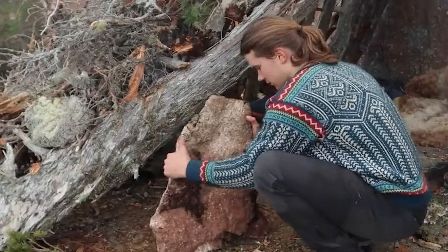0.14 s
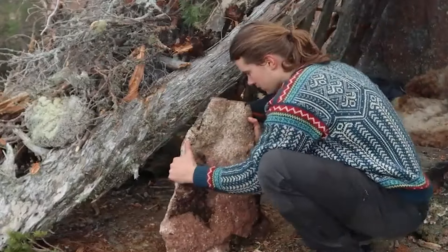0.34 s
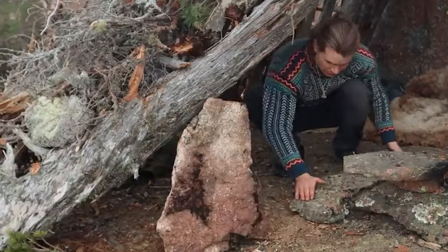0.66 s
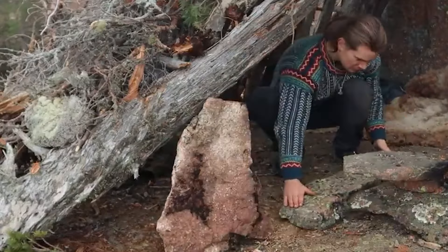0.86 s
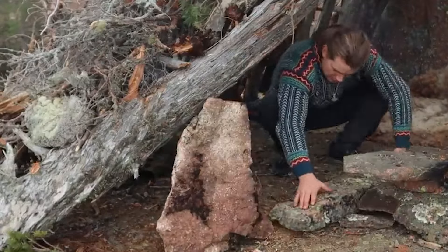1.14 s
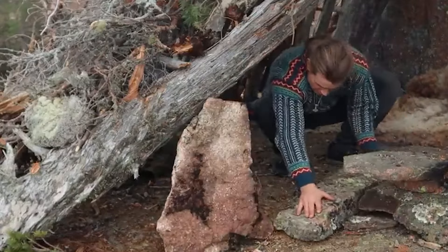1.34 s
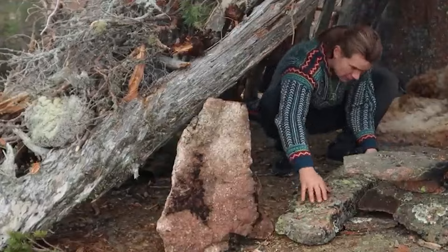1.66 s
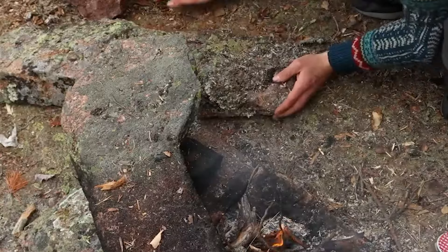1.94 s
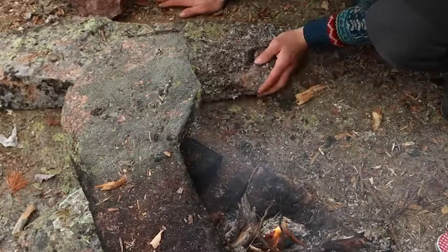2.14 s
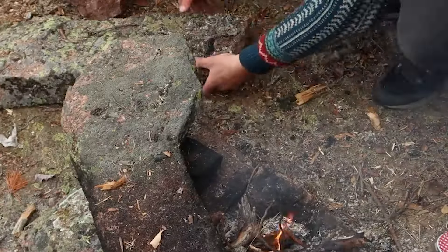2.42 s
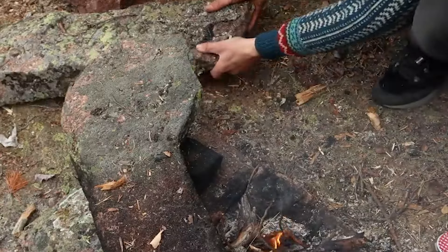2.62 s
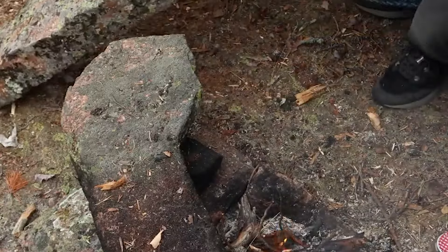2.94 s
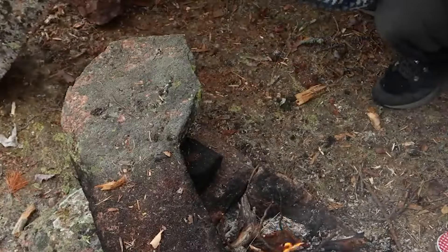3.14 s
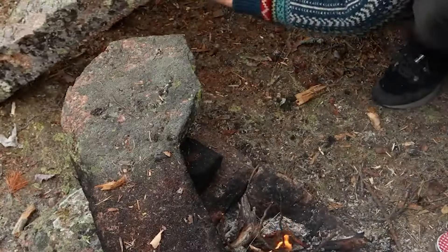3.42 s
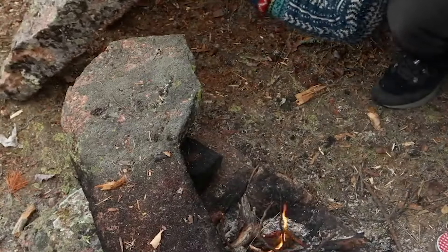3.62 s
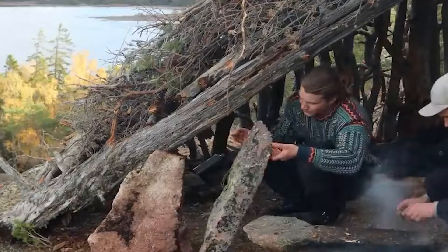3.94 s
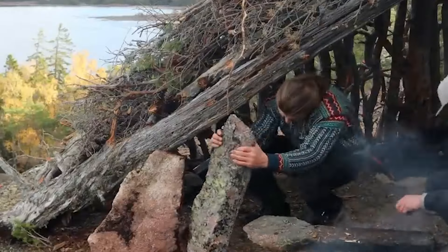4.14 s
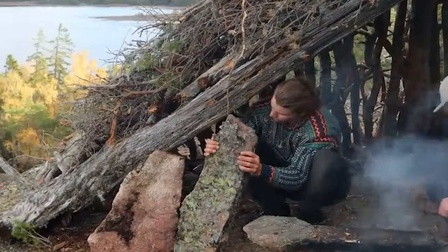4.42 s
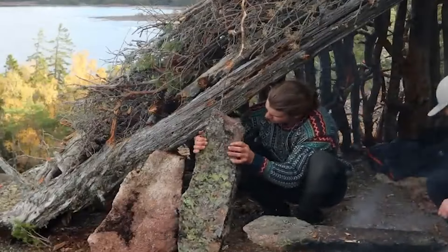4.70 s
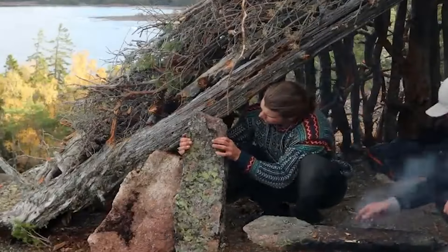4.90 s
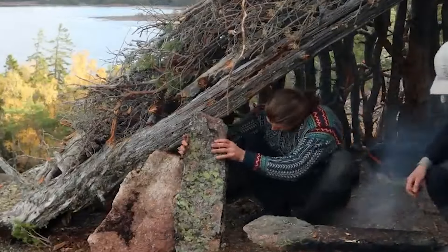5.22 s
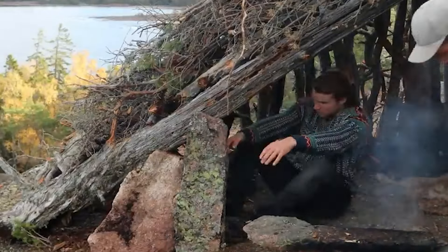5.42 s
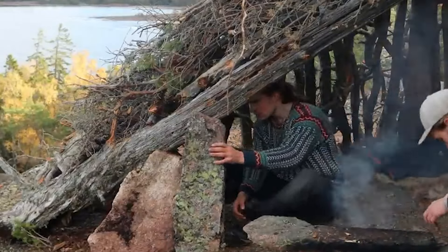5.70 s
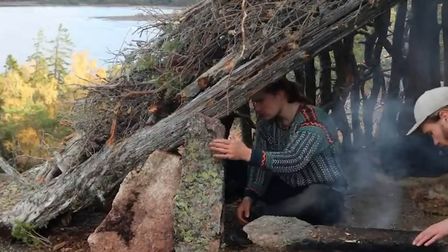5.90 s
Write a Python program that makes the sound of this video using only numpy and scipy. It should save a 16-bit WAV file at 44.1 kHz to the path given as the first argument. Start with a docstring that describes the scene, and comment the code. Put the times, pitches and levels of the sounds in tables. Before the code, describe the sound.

Stone knocks and grinds on stone in irregular bursts: a clatter with a sharp crack at first, then dull low thumps, then several squealing drags and bright hard blows. After a brief lull comes a crackle of twigs and one heavy scraping clunk, then only soft bumps, brushing cloth and small snaps. Dry, close outdoor pickup with constant airy hiss and faint fire ticks.

```python
"""Rock slabs are dragged over stone and stood on edge beside a campfire, outdoors.
Each shove is a train of tiny slips that rings the slab and makes it squeal; grit crunches under it.
Knocks, from faint ticks to hard blows, are short bursts of force that ring the slab, mostly near 2 kHz.
Snapping twigs, low bumps, a thin swish, rustling clothes and swells of low rumble are shaped noise
or fading tones over an outdoor hiss of changing level; a fast limiter holds the peaks."""
import sys
import numpy as np
from scipy import signal
from scipy.fft import rfft, irfft
from scipy.io import wavfile
from scipy.ndimage import uniform_filter1d, minimum_filter1d

SR = 44100
rng = np.random.default_rng(int(sys.argv[2]) if len(sys.argv) > 2 else 0)


def bounce(signal):
    """Save signal as a 16-bit WAV file at the path given by the first command-line argument."""
    frames = np.transpose(np.atleast_2d(signal))
    limited = np.clip(frames, -1, 1)
    pcm = np.round(limited * 32767).astype(np.int16)
    wavfile.write(sys.argv[1], SR, pcm)


N = 267246
TIME = np.arange(N) / SR


def gain_of(db):
    """Turns decibels into a factor for the sound's size."""
    return 10 ** (np.asarray(db) / 20)


def evened(x):
    """Scales x to an average (rms) level of one."""
    return x / np.sqrt(np.mean(x ** 2) + 1e-20)


def add(mix, start_s, sound):
    """Adds a sound to the mix at its moment, cutting off what runs past the end."""
    part = mix[max(round(start_s * SR), 0):][:len(sound)]
    part += sound[:len(part)]


def coloured(x, points):
    """Makes each pitch range of x louder or softer as the points say, at unit level."""
    hz, db = np.transpose(points)
    freqs = np.fft.rfftfreq(N, 1 / SR)
    shape = np.interp(np.log(freqs + 1), np.log(hz), db)
    return evened(irfft(rfft(x) * gain_of(shape), N))


def band(x, lo_hz, hi_hz):
    """Keeps mainly the pitches between two limits."""
    edges = [lo_hz, min(hi_hz, SR / 2.2)]
    return signal.sosfilt(signal.butter(N=2, Wn=edges, btype="band", fs=SR, output="sos"), x)


def stroke(start, end, db, swell_db, attack_s, release_s, arch_db):
    """The gain of one movement: a quick rise, an arched hold that swells or fades, a quick release."""
    along = np.clip((TIME - start) / (end - start), 0, 1) * 2 - 1  # -1 at the start, 1 at the end
    rise = np.clip((TIME - start) / attack_s + .5, 0, 1)
    release = np.exp(-np.maximum(TIME - end, 0) / release_s)
    return rise * release * gain_of(db + swell_db * along / 2 - arch_db * along ** 2)


def slips(per_s, spread_db):
    """Tiny slips at random moments, a few much larger than the rest; their power stays even over a stroke."""
    size = gain_of(spread_db * np.minimum(rng.exponential(1, N), 4)) * rng.choice([-1, 1], N)
    train = size * (rng.random(N) < per_s / SR)
    local_power = abs(uniform_filter1d(train ** 2, size=900))
    return train / np.sqrt(local_power + 0.0085 * np.mean(train ** 2))


def judder(per_s=100, uneven=.35, jolt_s=0.0021, sliding=.35):
    """Stick and slip: the slab catches at uneven intervals, and each release lets it lurch on."""
    gaps, sizes = rng.standard_normal((1200, 2)).T
    times = np.cumsum(np.exp(uneven * gaps)) / per_s - 1  # begins before the sound does
    last = np.searchsorted(times, TIME) - 1
    age = (TIME - times[last]) / jolt_s
    lurch = age * np.exp(1 - age + uneven * sizes[last])
    return evened(sliding + lurch)


# Colour of the open air: pitch_hz, level_db
OPEN_AIR_COLOUR = [(25, -45), (60, -43), (150, -8.5), (300, -1), (700, 1.5), (1300, 2.5), (2000, 0.5),
                   (3000, -5), (4300, -7.5), (6000, -11.5), (9000, -19), (16000, -32)]
# Colour of the air down by the fire: pitch_hz, level_db
FIRESIDE_COLOUR = [(25, -55), (60, -28), (150, -17.5), (300, -7.5), (680, -0.5), (1100, -5), (2000, -4.5),
                   (3000, -7.5), (3900, -8.5), (6000, -14.5), (9000, -21.5), (16000, -28.5)]
# Level of the outdoor hiss over time, before a small overall lift: time_s, level_db
AIR_LEVEL = [(0.0, -30), (0.34, -29), (0.52, -32), (1.08, -31.5), (1.77, -33.5), (1.89, -38.5),
             (2.3, -35.5), (2.45, -38.5), (3.0, -37.5), (4.0, -38), (4.19, -31.5), (4.52, -32.5),
             (4.71, -31), (6.06, -28.5)]
# Middle scene, close to the fire: start_s, end_s
BY_THE_FIRE = (1.79, 3.9)
OPEN_SHARE = 0.74  # share of the open-air colour's power outside the middle scene; none in that scene


def air(trim_db=2):
    """Outdoor hiss made of coloured noise, with another colour in the middle scene, near the fire."""
    outside = (TIME < BY_THE_FIRE[0]) | (TIME > BY_THE_FIRE[1])
    share = OPEN_SHARE * outside
    far = coloured(rng.standard_normal(N), OPEN_AIR_COLOUR)
    near = coloured(rng.standard_normal(N), FIRESIDE_COLOUR)
    level_db = np.interp(TIME, *np.transpose(AIR_LEVEL)) + trim_db
    return gain_of(level_db) * (np.sqrt(share) * far + np.sqrt(1 - share) * near)


def embers(level_db=-53):
    """The fire ticks faintly: single clicks at random moments, coloured like the grit."""
    ticks = rng.standard_normal(N) * (rng.random(N) < 35 / SR)  # about 35 a second
    return gain_of(level_db) * coloured(ticks, GRIT_COLOUR)


# Colour of the low rumble: pitch_hz, level_db
RUMBLE_COLOUR = [(15, -59), (25, -29), (102, -6.5), (210, 0), (310, -0.5), (395, -3.5), (541, -10),
                 (600, -24), (900, -25), (1170, -66), (1980, -120)]
# Swells of low rumble, wind buffeting and shuffling, before the trims below:
# start_s, end_s, level_db, swell_db
RUMBLE_SWELLS = [(0.018, 0.347, -31.5, -1), (.36, .78, -30, -11.5), (0.847, 1.123, -25, -2.5),
                 (1.129, 1.316, -21.5, -0.5), (1.336, 1.436, -16.5, -2.5), (1.45, 1.756, -24.5, 2.5),
                 (3.775, 4.063, -33.5, 0.5), (4.168, 4.25, -25, -3), (4.302, 4.45, -30, -2),
                 (4.953, 5.04, -35.5, -6), (5.204, 5.343, -34, -1), (5.54, 5.804, -32.5, -5),
                 (5.954, 6.06, -38, -13)]


def rumbling(trim_db=-2.5, strong_db=-20, scuff_db=-6):
    """Dull swells of low rumble, a train of coloured slips; the strongest swells also scuff higher up."""
    swells = sum(stroke(*row, attack_s=0.043, release_s=0.025, arch_db=2.5) for row in RUMBLE_SWELLS)
    rumble = coloured(slips(per_s=1200, spread_db=3), RUMBLE_COLOUR)
    scuff = evened(band(slips(per_s=490, spread_db=2), 420, 725))
    strength = np.minimum(swells / gain_of(strong_db), 1) ** 2
    return swells * (gain_of(trim_db) * rumble + gain_of(scuff_db) * strength * scuff)


# The slab's modes, its natural ways of ringing, before its rest changes them: pitch_hz, width_hz, level_db
SLAB_MODES = [(156, 120, -30), (307, 91, -23.5), (476, 195, -15.5), (705, 186, -10.5), (903, 226, -9.5),
              (1104, 107, -9), (1365, 233, -7.5), (1945, 115, 2), (2198, 56, -12), (2756, 92, -15),
              (3745, 75, -9.5), (4004, 82, -10.5), (4320, 120, -14), (6340, 300, -15.5), (9300, 290, -27)]
# How the slab rests: the contact favours two modes and the support detunes all of them:
# from_s, lower_hz, upper_hz, pitch_factor
RESTS = [(0, 1400, 4400, 1.005), (1.7, 1000, 4170, 1), (2.05, 1280, 4020, 1), (2.238, 900, 2240, 1.025),
         (2.4, 1000, 4600, 1), (2.6, 1350, 4320, .995), (3.1, 1150, 4200, 1), (3.5, 1000, 3800, .995),
         (3.68, 1000, 4200, 1), (4.4, 620, 1945, 1)]


def slab_at(time_s, lower_db=5.5, upper_db=8, scatter_db=2.67):
    """The slab's body, main, upper and top modes as it rests at one moment, with a little chance."""
    modes = np.array(SLAB_MODES, float)
    _, lower, upper, pitch = [row for row in RESTS if row[0] <= time_s][-1]
    favoured = lower_db * np.exp(-((modes[:, 0] - lower) / 300) ** 2)
    favoured += upper_db * np.exp(-((modes[:, 0] - upper) / 150) ** 2)
    modes[:, 2] += favoured + scatter_db * rng.standard_normal(len(modes))
    modes[:, 0] *= pitch * (1 + .004 * rng.standard_normal(len(modes)))
    return np.split(modes, np.searchsorted(modes[:, 0], [1650, 2550, 5000]))


def ring(x, modes):
    """Drives a set of damped modes, each of which radiates only near its own pitch."""
    total = 0
    for hz, width, db in modes:
        resonance = signal.lfilter(*signal.iirpeak(hz, hz / width, SR), x)
        total = total + gain_of(db) * band(resonance, hz / 1.38, hz * 1.55)
    return total


# Knocks from faint ticks and dull thuds to hard blows of stone on stone, before the trims below;
# level_db sets the main ring, and body_db and brightness_db are relative to it:
# start_s, level_db, body_db, brightness_db
KNOCKS = [(.104, -24, -15, -12), (.3135, -14.5, -12, -26), (.752, -26, -13, -5), (.9445, -10, -12, -4),
          (.958, -14, -17, -5), (.9965, -24, -7, 3), (1.007, -18, 3, 14), (1.0225, -22, -2, 9),
          (1.0295, -17, 1, -2.5), (1.109, -15, -4, -17), (1.814, -28, -4.5, -19), (1.862, -25, 9, -8),
          (1.895, -5.5, -20, -23), (1.921, -22, 1.5, -11), (2.219, -29, -10, 11), (2.247, -19.5, -3.5, -9),
          (2.295, -18.5, 0.5, -9), (2.447, -30, 9.5, 2), (2.6855, -18.5, -27, -21), (2.709, -14, -25, -21),
          (2.721, -10, -11, -4.5), (2.7885, -23, 2, -7), (2.817, -15, -1, -4), (2.8239, -14, -2.5, 5),
          (2.832, -20.5, 1, 6), (2.852, -23.5, -8, 2.5), (3.141, -24.5, -2, -3.5), (3.188, -27, -7, 5),
          (3.542, -19, -3, -7), (3.5888, -24, 4, 4.5), (3.608, -18.5, 4, 4), (3.6239, -21, 5, -4),
          (3.628, -1, -13, -0.5), (3.637, -2, -15, -22), (3.6465, -24.5, 11.5, 9.5),
          (4.019, -25.5, -4, 0.5), (4.291, -28.5, 9.5, -14), (4.5455, -6, -11.5, -30),
          (4.5765, -2, -7.5, -7), (4.598, -10.5, -7, -4.5), (4.6155, -19, 0, -5), (4.649, -15.5, 2.5, -3.5),
          (4.655, -12.5, -15, -17), (4.7, -30, 9, -4), (4.9385, -26.5, 10, -2), (5.0385, -27, 12, -14),
          (6.01, -24.5, 2, -3)]
CRACK_PER_BRIGHT = 0.57  # dB of splintering crack for each dB of brightness


def knocks(contact_s=0.00066, crack_s=0.0013, damping_s=0.033,
           body_db=-2, ring_db=-1, upper_db=-2, crack_db=-9, top_ring=16):
    """A blow softened by crumbling grains rings the slab, whose own weight then chokes the ring."""
    out, t = np.zeros(N), np.arange(SR // 25) / SR
    head = slice(round(.006 * SR))  # each part's level is set over its first 6 ms
    choke = 1 / (1 + (t / damping_s) ** 4)
    for start, db, body, bright in KNOCKS:
        grains, splinters = rng.standard_normal((2, len(t)))
        force = grains * (t / contact_s) * np.exp(-t / contact_s)
        force[0] += 4  # the sharp first touch
        low, main, high, top = slab_at(start)
        crack = splinters * np.sqrt(t / crack_s) * np.exp(-t / crack_s)
        splinter = band(crack, 2900, 11300)
        parts = [(ring(force, main), ring_db),
                 (ring(force, low), body + body_db),
                 (ring(force, high), bright + upper_db),
                 (splinter + top_ring * ring(splinter, top), CRACK_PER_BRIGHT * bright + crack_db)]
        blow = sum(gain_of(db + rel) * part / np.std(part[head]) for part, rel in parts)
        add(out, start, choke * blow)
    return out


# Snapping twigs, embers and grains: start_s, peak_db, pitch_hz
SNAPS = [(.191, -21, 8000), (.2, -27, 9000), (.338, -22, 11000), (.349, -19, 10000), (.6147, -23.5, 8800),
         (0.658, -19, 9900), (.78, -18, 7150), (.847, -18.5, 10000), (.865, -14, 4500), (0.887, -16, 8600),
         (1.0155, 2, 11900), (1.11, -14, 2660), (1.194, -19, 9000), (1.434, -15.5, 8260),
         (1.744, -20.5, 7950), (2.447, -9.5, 4700), (2.467, -23, 6800), (2.497, -17.5, 7950),
         (4.153, -15.5, 8500), (4.169, -13, 5930), (4.192, -4, 4500), (4.227, -21, 7000),
         (4.267, -9.5, 3570), (4.282, -9, 7500), (4.289, -13, 3330), (4.938, -18.5, 6360),
         (5.2097, -18.5, 8000), (5.324, -17.5, 6500), (5.391, -12, 4250), (5.529, -15, 4970),
         (6.009, -8.5, 5800)]
SNAP_CYCLES = 142  # swings until a snap is 60 dB down, so thick twigs crack lower and longer


def snaps(spread=1.51, wide=0.36):
    """A short burst of fracture noise with one broad resonance."""
    out, t = np.zeros(N), np.arange(SR // 16) / SR
    for start, db, hz in SNAPS:
        fade = gain_of(-60 * t * hz / SNAP_CYCLES)
        burst = rng.standard_normal(len(t)) * fade * (1 - np.exp(-t / 0.00054))
        snap = band(burst, hz / spread, hz * spread) + wide * band(burst, hz / 3, 15300)
        add(out, start, gain_of(db) * snap / abs(snap).max())
    return out


def squeal(hz, size, waver_hz=22):
    """Steady friction locks onto one mode and keeps it singing, with a wavering pitch."""
    drift = evened(uniform_filter1d(rng.standard_normal(size), size=300))
    return evened(np.sin(2 * np.pi * np.cumsum(hz + waver_hz * drift) / SR))


# Colour of the crushed grit: pitch_hz, level_db
GRIT_COLOUR = [(1500, -22), (3500, 5), (5000, 1.5), (7500, -4), (10000, 0), (13000, -6.5), (16000, -9)]
# One row a shove; the body and upper ring are relative to the main ring:
# start_s, end_s, grinding_db, grit_db, swell_db, body_db, upper_ring_db
SHOVES = [(0.297, 0.348, -30, -40, -2, -4, -6), (0.863, 0.95, -30.5, -29, -4, -4, -1),
          (0.941, 1.021, -17.5, -23, 9, -2.5, -2), (1.335, 1.459, -24.5, -35.5, 17.5, -9, -1),
          (1.806, 1.935, -17, -39, -0.5, -0.5, 0.5), (2.089, 2.12, -28.5, -45, -2, 2, 7),
          (2.139, 2.177, -17, -23.5, 1, -2.5, 3.5), (2.178, 2.243, -18.5, -37, -4, 1, 7.5),
          (2.237, 2.317, -22, -38, 2, -2, 7), (2.417, 2.46, -36, -32, 10, 5, 7),
          (2.676, 2.728, -21, -40, 10, 0, 4), (2.733, 2.795, -45, -35, 0, -4, -4),
          (2.812, 2.875, -20, -28, -16, 0, 0), (3.538, 3.613, -20, -45, -5, -3, 1.5),
          (3.603, 3.66, -20.5, -49, 12, 2, 0), (3.705, 3.748, -33, -50, 16, 1, 6),
          (4.533, 4.636, -15.5, -39, 7, 4, -1.5), (4.79, 4.851, -29, -35.5, 10, 12, 5.5)]
SHOVE_ATTACK_S, SHOVE_RELEASE_S = 0.0061, 0.0036
SHOVE_ARCH_DB = 7.5  # the push is this much stronger midway than at its ends, apart from the swell
CREEP_DB, CREEP_ATTACK_S, CREEP_RELEASE_S = -22, 0.047, 0.021  # faint creep before and after the slide
SQUEAL_DB, UPPER_SQUEAL_DB = -4, -14  # the upper squeal also follows the shove's upper ring


def scrapes():
    """Slips ring the slab and make its strongest modes squeal, while crushed grit crackles under it."""
    jolts = judder()
    friction = slips(per_s=1700, spread_db=3.4) * jolts
    grit = coloured(slips(per_s=4000, spread_db=5.0) * jolts, GRIT_COLOUR)
    out = np.zeros(N)
    for start, end, force_db, crunch_db, swell_db, body_db, upper_db in SHOVES:
        span = slice(round((start - .04) * SR), round((end + .06) * SR))  # leaves room for the creep
        slide = stroke(start, end, 0, swell_db, SHOVE_ATTACK_S, SHOVE_RELEASE_S, SHOVE_ARCH_DB)
        creep = stroke(start, end, CREEP_DB, swell_db, CREEP_ATTACK_S, CREEP_RELEASE_S, 0)
        low, main, high, top = slab_at((start + end) / 2)
        ring_parts = [(low, body_db), (main, 0), (high, upper_db), (top, 0)]
        rasp = evened(sum(gain_of(db) * ring(friction[span], modes) for modes, db in ring_parts))
        song = 0
        for modes, db in [(main, SQUEAL_DB), (high, UPPER_SQUEAL_DB + upper_db)]:
            strongest_hz = modes[modes[:, 2].argmax(), 0]
            song = song + gain_of(db) * squeal(strongest_hz, len(rasp))
        grind = gain_of(force_db) * evened(rasp + song)
        crunch = gain_of(crunch_db) * evened(grit[span])
        out[span] += np.maximum(slide, creep)[span] * (grind + crunch)
    return out


# A thin swish, one row: start_s, end_s, level_db, swell_db
SWISH = (.88, 1.03, -27, 3)
SWISH_HZ, SWISH_END_HZ, SWISH_SLOWING_S = 9300, 7100, .06  # starting pitch, pitch it sinks towards


def swish(width_hz=900):
    """Fine, juddering rubbing whose pitch follows the sliding speed, falling as the slide slows."""
    speed = np.exp(-np.maximum(TIME - SWISH[0], 0) / SWISH_SLOWING_S)
    pitch_hz = SWISH_END_HZ + (SWISH_HZ - SWISH_END_HZ) * speed
    turn = np.exp(2j * np.pi * np.cumsum(pitch_hz) / SR)
    lowpass = signal.butter(N=2, Wn=width_hz / 2, fs=SR, output="sos")
    blur = signal.sosfilt(lowpass, rng.standard_normal(N) / turn)
    rubbing = evened((turn * blur).real)  # a narrow band of noise around the moving pitch
    return rubbing * judder() * stroke(*SWISH, SHOVE_ATTACK_S, SHOVE_RELEASE_S, 0)


# Colour of cloth and hands on rock: pitch_hz, level_db
CLOTH_COLOUR = [(800, -12.5), (2000, 8), (5000, 1), (9000, -1.5), (14000, -5), (16000, -6)]
# Clothes and hands brush the rock: start_s, end_s, level_db, swell_db
BRUSHES = [(1.08, 1.35, -41.5, 6), (3.39, 3.7, -43, -12), (4.016, 4.243, -37, -3), (4.26, 4.46, -35, -1),
           (5.346, 5.484, -30.5, -2), (5.624, 5.77, -36, 1), (5.77, 5.88, -30, 0)]


def rustle():
    """Clothes and hands brush the rock: a dense train of tiny slips, coloured and shaped by each stroke."""
    rubbing = sum(stroke(*row, attack_s=.03, release_s=0.041, arch_db=4) for row in BRUSHES)
    return rubbing * coloured(slips(per_s=6000, spread_db=2.5), CLOTH_COLOUR)


# The slab's foot bumps on packed earth: start_s, peak_db, pitch_hz
BUMPS = [(1.162, -14.5, 205), (1.3523, -9, 673), (1.385, -13, 450), (3.801, -24.5, 243), (4.205, -31, 215),
         (4.354, -22, 249), (4.799, -14, 700), (4.818, -18.5, 592), (4.845, -20.5, 714),
         (4.9385, -20.5, 700), (5.039, -18, 584), (5.22, -21, 330), (5.555, -24.5, 221)]
BUMP_CYCLES = 16.3  # swings until a bump is 60 dB down


def bumps():
    """Three fading tones make each low blow, which the earth damps within a few cycles."""
    out, t = np.zeros(N), np.arange(SR // 8) / SR
    for start, db, hz in BUMPS:
        tones = [(.66, 0.41), (1, 1), (1.5, 0.21)]  # pitch ratio, size
        thud = sum(size * np.sin(2 * np.pi * hz * ratio * t) for ratio, size in tones)
        thud *= gain_of(-60 * t * hz / BUMP_CYCLES) * (1 - np.exp(-t / 0.0035))
        add(out, start, gain_of(db) * thud / abs(thud).max())
    return out


def with_echo(x, wet_db=-21, t60_s=0.042):
    """Logs and ground scatter a short, weak echo, made from fading noise."""
    t = np.arange(SR // 4) / SR
    tail = band(rng.standard_normal(len(t)), 330, 7300) * gain_of(-60 * t / t60_s) * (t > .003)
    echo = signal.fftconvolve(x, tail / np.linalg.norm(tail))[:N]
    return x + gain_of(wet_db) * echo


def scene():
    """Adds all the layers; only the knocks, snaps, scrapes and bumps get the echo."""
    echoing = with_echo(knocks() + snaps() + scrapes() + bumps())
    return (air() + embers() + rumbling() + echoing + swish() + rustle())[None]


CEILING_DB = -6.2  # the limiter turns down peaks above this level


def record(dry):
    """A fast limiter flattens the loudest peaks; then a filter removes the very highest pitches."""
    allowed = np.minimum(gain_of(CEILING_DB) / (abs(dry) + 1e-9), 1)
    limited = dry * uniform_filter1d(minimum_filter1d(allowed, size=40), size=40)
    lowpass = signal.firwin(511, 16050, window=("kaiser", 9), fs=SR)  # cutoff in Hz
    return signal.oaconvolve(limited, lowpass[None], "same")


dry = scene()
out = record(dry)
bounce(out)
```